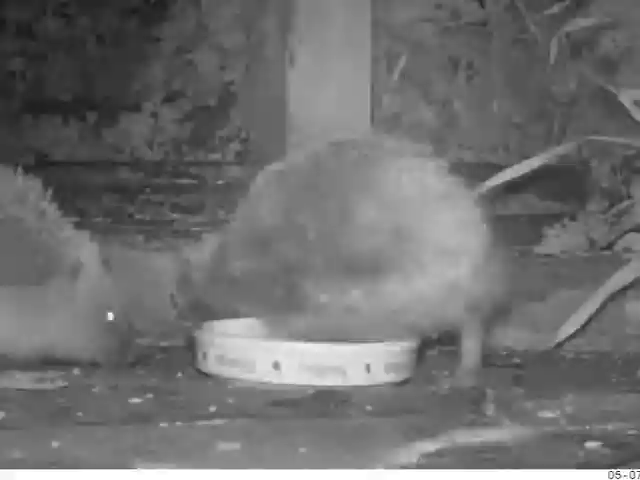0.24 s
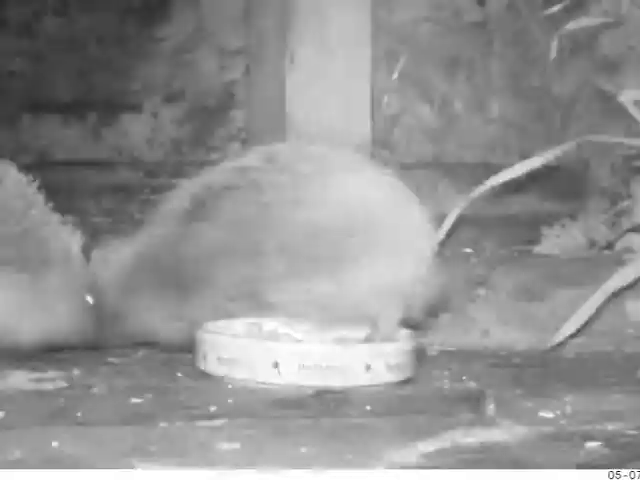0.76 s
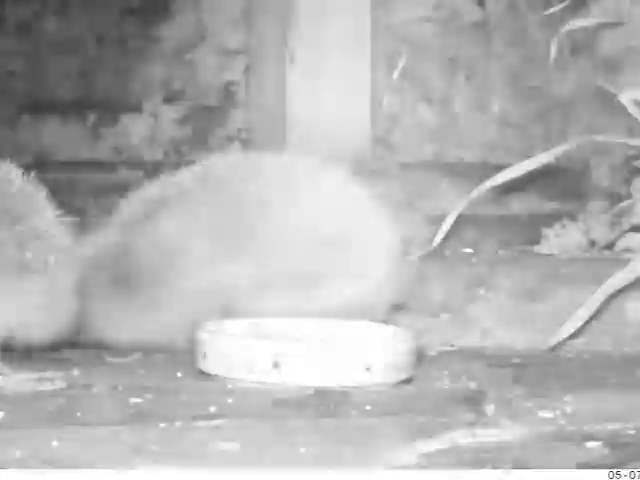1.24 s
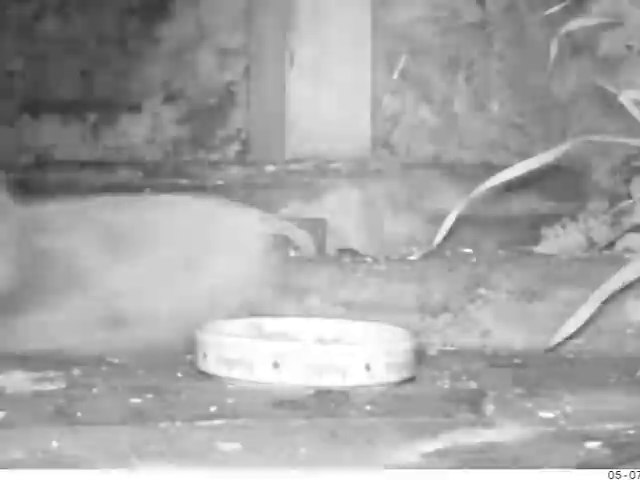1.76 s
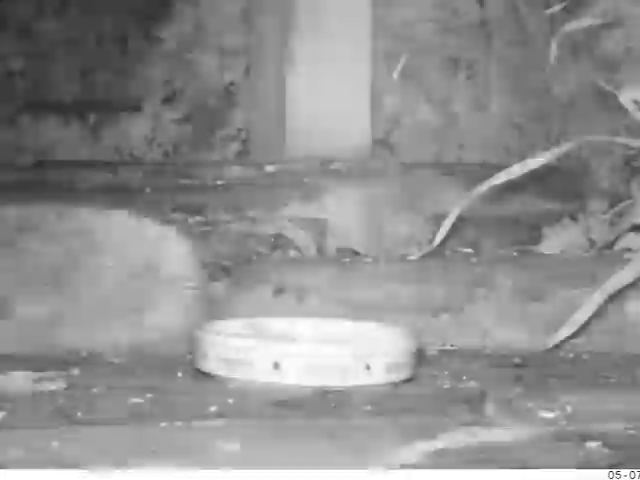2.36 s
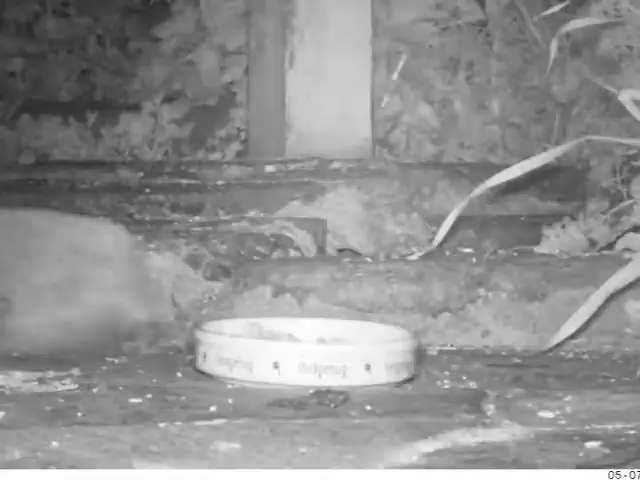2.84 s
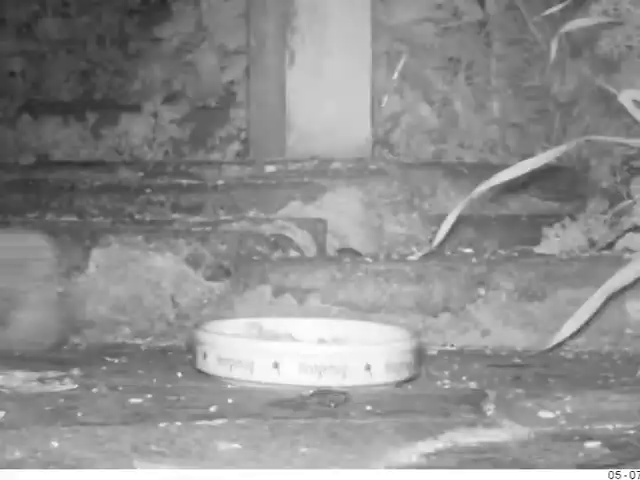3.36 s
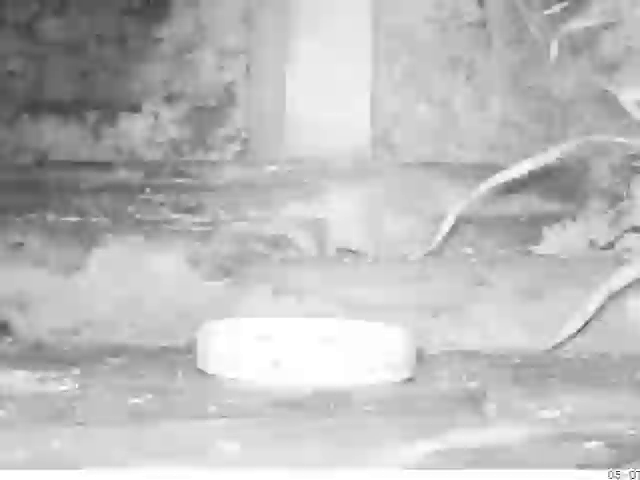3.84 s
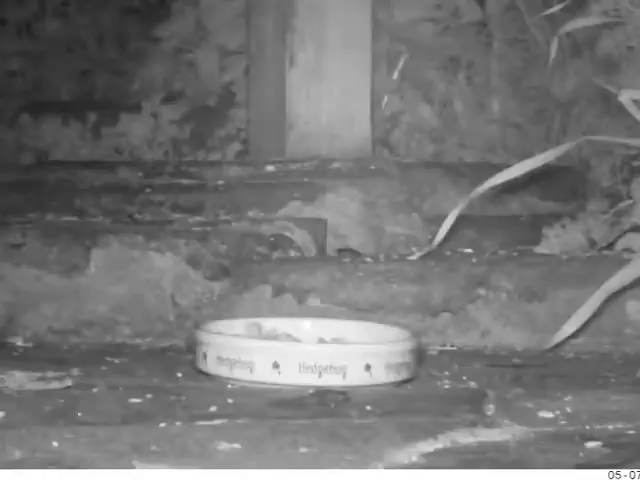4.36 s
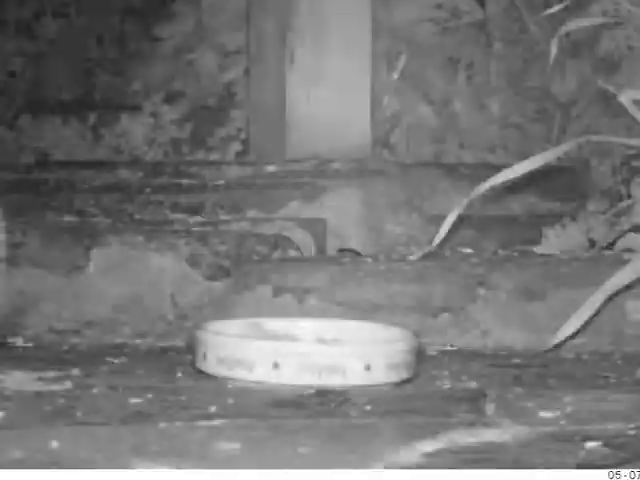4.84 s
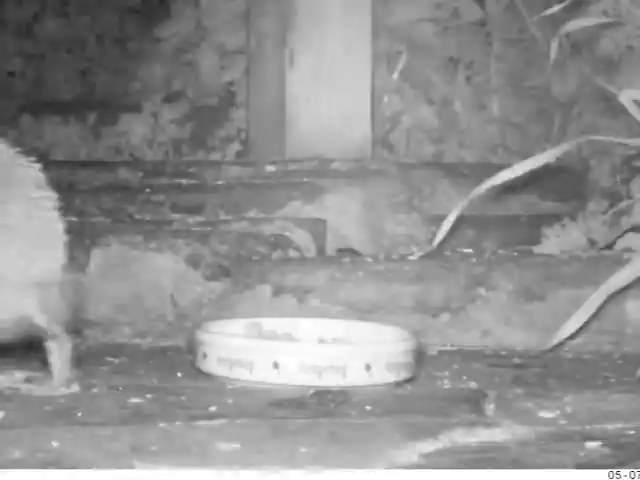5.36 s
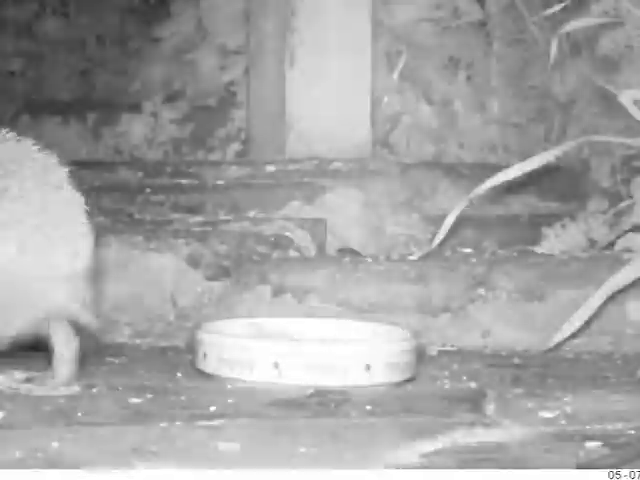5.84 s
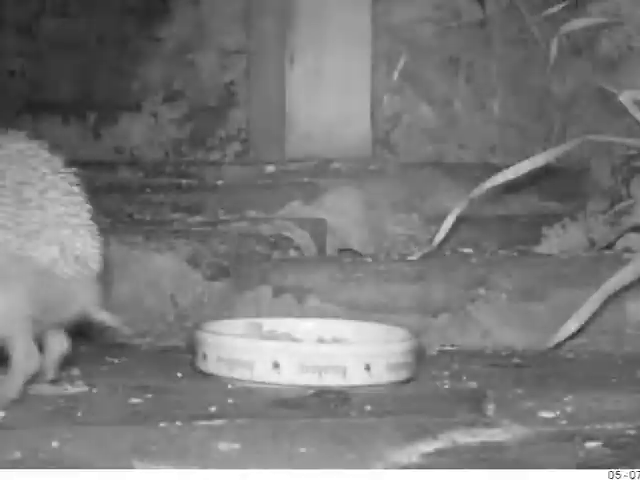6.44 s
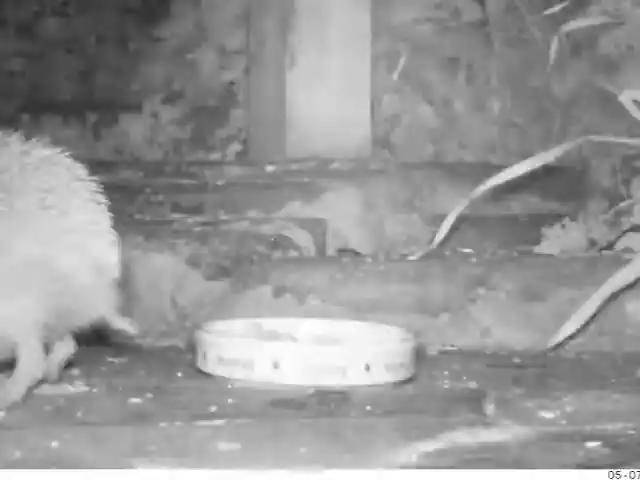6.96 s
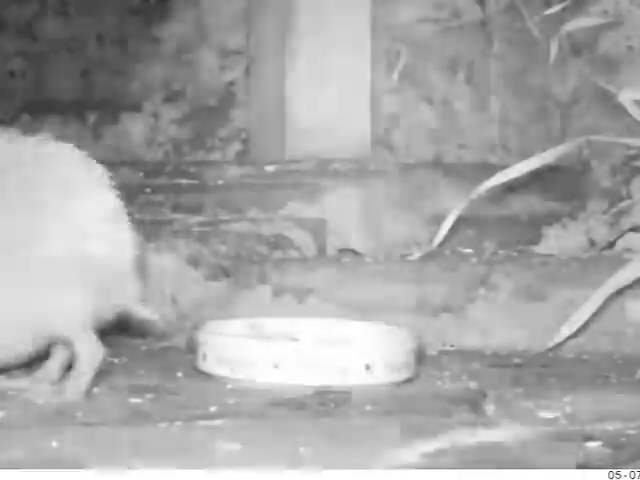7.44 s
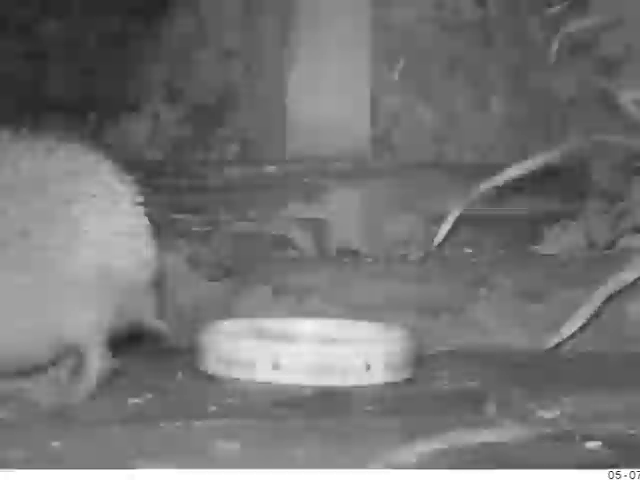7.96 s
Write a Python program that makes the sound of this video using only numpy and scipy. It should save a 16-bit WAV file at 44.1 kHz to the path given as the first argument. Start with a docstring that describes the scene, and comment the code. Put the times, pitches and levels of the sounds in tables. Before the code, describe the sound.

Close, dry, airy puffs from a hedgehog repeat steadily after a quick bowl clatter, with faint scratches, rustling spines and quiet garden rumble.

```python
"""A bowl knocks on wooden boards, then a hedgehog huffs about three times a second, close to a trail camera.
Two hedgehogs shuffle round each other beside the food bowl at night; one steps off it and it is brushed again.
Each huff is noise, a jet of air coloured by throat, nostrils and the bounce off the boards; the knock is
thuds of noise with ringing sine modes, touches are faint rings and scratches, the rustle is swelling noise.
Short echoes lie round the bowl and huffs, and a quiet garden rumble with a soft hiss lies beneath."""
import sys
import numpy as np
from scipy import signal
from scipy.fft import rfft, irfft
from scipy.io import wavfile

SR = 44100
rng = np.random.default_rng(int(sys.argv[2]) if len(sys.argv) > 2 else 0)


def to_wav(s):
    """Save 16-bit WAV."""
    ch = np.atleast_2d(s).T  # columns
    pcm = np.round(np.clip(ch, -1, 1) * 32767)  # PCM
    wavfile.write(sys.argv[1], SR, pcm.astype(np.int16))


N = 362061  # length in samples

# Huffs. Each row: start in seconds, length in seconds, strength at the nose in dB, swell from start to end in dB.
HUFFS = [(.101, 0.11, -42.5, -6), (.522, .1, -42, -2), (0.866, 0.11, -43, -4.5), (1.192, .1, -45, -5.5),
         (1.497, 0.098, -46, 5), (1.789, .094, -45, -5), (2.168, .12, -47, 0.5), (2.461, .094, -49, 1),
         (2.776, .11, -44.5, 1.5), (3.195, 0.088, -44, -0.5), (3.547, 0.09, -44.5, 4),
         (3.785, 0.087, -41, 2.5), (4.324, .11, -41.5, 2.5), (4.656, .11, -43, -2.5),
         (4.943, 0.092, -43, 4.5), (5.23, 0.085, -43, 7.5), (5.618, .1, -41.5, -2.5), (6.02, .1, -44.5, 0),
         (6.378, 0.096, -42.5, 2), (6.946, 0.078, -48, 4.5), (7.285, 0.091, -44, -5), (7.617, 0.1, -44, 5),
         (7.909, 0.082, -43.5, -2.5)]
# Pose of the snout before the microphone. Each row: time in seconds, band cancelled by the bounce off the
# boards in Hz, brightness from facing the microphone in dB, main nose resonance in Hz.
SNOUT = [(.1, 2100, 1.5, 4140), (.87, 2310, -3.5, 4210), (1.189, 3900, -1, 4110), (1.79, 3400, -4.5, 4080),
         (2.46, 3140, 1, 4080), (3.2, 2280, -2, 4090), (3.79, 2260, -2, 3960), (4.32, 2600, -6, 4060),
         (4.66, 4750, 0.5, 4060), (4.95, 5100, -4, 4020), (5.23, 2650, -3.5, 4060), (5.62, 2780, -4, 4070),
         (6.02, 2800, 6, 4020), (6.38, 2250, 5, 4010), (7.29, 1850, 3, 3970), (7.62, 1830, -2, 4030)]
# Nostril hiss in a huff of the usual strength. Each row: time in seconds, level in dB.
NOSTRIL_HISS_LEVEL = [(.6, -59), (1.3, -57), (3.7, -57.5), (4.5, -55.5), (5.6, -58.5), (6.1, -55.5),
                      (7.2, -58), (7.9, -53)]
# Resonances of lower throat, upper throat, nose at rest and nostril hiss, before any shift by pose or chance.
# Each row: frequency in Hz, width in Hz, relative level in dB.
THROAT = [(882, 810, -1), (325, 190, -6)]
UPPER_THROAT = [(1870, 390, 0), (2440, 900, -1)]
NOSE = [(3076, 610, -7), (3692, 420, -1.5), (4114, 460, 2.5), (5096, 492, -4.5), (5920, 210, -13),
        (6630, 700, -22.5)]
NOSTRIL_HISS = [(7500, 270, -19.5), (8030, 3100, -10), (11150, 2300, -9.5), (12040, 1100, 0.5),
                (13250, 1400, -11.5)]
REST_NOSE_HZ = 4047  # main nose resonance at rest
NOTCH_DB, NOTCH_WIDTH_HZ = -10.5, 340  # depth and width of the cancelled band
USUAL_DB = -44  # usual strength at the nose
THROAT_DB, UPPER_THROAT_DB = -52.5, -54.5  # in a huff of the usual strength
THROAT_FOLLOW, HISS_FOLLOW = .15, .25  # dB gained per dB of strength
UPPER_THROAT_TURN = .4  # dB lost per dB of facing the microphone


def huffs(attack_s=0.021, release_s=0.018, lead_s=.006, hang_s=0.0037, throat_lag_s=.0025,
          flutter_db=0.6, flutter_hz=150, sway_db=1.02, sway_hz=32, arch_db=1.5, hiss_stretch=0.013):
    """Each huff is a turbulent jet that snaps on, holds and stops; it rings throat and nose and hisses at the nostrils."""
    out, n = np.zeros(N), SR // 5
    t, f = np.arange(n) / SR, freqs(n)
    pose_s, *pose = np.transpose(SNOUT)
    hiss_s, hiss_levels_db = np.transpose(NOSTRIL_HISS_LEVEL)
    for s, length, nose_db, swell_db in HUFFS:
        notch_hz, tilt_db, nose_hz = (np.interp(s, pose_s, column) for column in pose)
        effort_db = nose_db - USUAL_DB
        hiss_db = np.interp(s, hiss_s, hiss_levels_db) + HISS_FOLLOW * effort_db

        # the bounce off the boards cuts a notch that moves with the snout
        notch = undb(NOTCH_DB * np.exp(-((f - notch_hz) / NOTCH_WIDTH_HZ) ** 2))
        paths = deflect(f)
        # a snout turned toward the microphone sounds brighter and less throaty
        facing = undb(tilt_db * np.interp(f, [3200, 5100], [-.5, .5]))
        nose = noise(n, paths * notch * facing * resonances(f * REST_NOSE_HZ / nose_hz, NOSE))

        lower = undb(THROAT_DB) * noise(n, paths * resonances(f, THROAT))
        upper = noise(n, paths * resonances(f, UPPER_THROAT))
        upper = irfft(notch * rfft(upper), n)  # here the notch also lowers the level
        throat = lower + undb(UPPER_THROAT_DB - UPPER_THROAT_TURN * tilt_db) * upper

        # the nostrils are never shaped quite the same twice
        stretch = 1 + hiss_stretch * rng.standard_normal()
        hiss = noise(n, paths * resonances(f * stretch, NOSTRIL_HISS))

        age = t - lead_s
        progress = np.clip(age / length, 0, 1) - .5  # -0.5 at the start, 0.5 at the end
        stop = (1 - np.tanh(2 * (age - length - hang_s) / release_s)) / 2
        flow = stop * undb(-arch_db * (2 * progress) ** 2)
        # the narrow nostrils sound first, the throat follows as the flow builds
        jet = undb(nose_db + swell_db * progress) * nose + undb(hiss_db) * hiss
        jet = push(t, attack_s) * jet
        rush = push(t, attack_s + throat_lag_s) * undb(THROAT_FOLLOW * effort_db) * throat
        # the moist nostrils flutter in the stream
        flutter = undb(flutter_db * walk(n, flutter_hz) + sway_db * walk(n, sway_hz))
        add(out, s - lead_s, flow * (jet * flutter + rush))
    return out


# Contacts of the bowl with the boards. Each row: time in seconds, relative level in dB.
KNOCKS = [(0.049, -5), (0.0511, 3), (0.0524, -2.5), (0.061, -19.5), (0.0723, -21.5), (0.0836, -23)]
# Colour of the thud of the boards. Each row: frequency in Hz, relative level in dB.
BOARDS = [(140, -36), (215, -4.5), (300, -10.5), (400, -22.5), (560, -12), (900, -14), (1300, -3.5),
          (1900, -9.5), (2600, -0.5), (3500, -11), (4500, -17.5), (6000, -32.5), (8500, -35.5),
          (14000, -55)]


def knock(thud_db=-21, thud_t60=0.023, tail_db=-16, tail_t60=.11, ring_db=-10.0, rise_s=0.00051,
          build_s=0.0037, chatter_db=2.0, chatter_hz=180, settle_db=-8, settle_s=.011):
    """The tipped bowl drops back and chatters: the boards thud at each contact, the bowl's ring builds up."""
    out, n = np.zeros(N), SR // 5
    t = np.arange(n) / SR
    decay = undb(-60 * t / thud_t60) + undb(tail_db - 60 * t / tail_t60)
    for s, db in KNOCKS:
        thud = noise(n, colour(n, BOARDS))
        add(out, s, undb(db + thud_db) * push(t, rise_s) * decay * thud)
    # once it is down, the wood damps the bowl, which buzzes against it and rings unevenly
    contact_db = (settle_db + chatter_db * walk(n, chatter_hz)) * push(t, settle_s)
    ring = undb(ring_db + contact_db) * push(t, build_s) * bowl_ring(t, False)
    add(out, KNOCKS[1][0], ring)  # the ring starts at the second contact
    return out


# Modes of the bowl on its boards, then one of its rim. Each row: frequency in Hz, time to fall 60 dB in
# seconds, relative level when knocked in dB, relative level when brushed in dB.
BOWL = [(215, 0.095, -18, -45.5), (549, 0.078, -16, -46.5), (1247, 0.077, -17.5, -41),
        (1600, 0.091, -18.5, -41), (2237, .06, -10, -33.5), (2410, .08, -16, -24.5),
        (2590, .06, -11.5, -35.5), (2814, .095, -3.5, -20), (2853, .025, -3.5, -25), (3080, .05, -12, -32),
        (3120, .07, -13.5, -29.5), (3370, 0.055, -15.5, -27), (4180, .055, -12.5, -8.5),
        (4430, 0.081, -19.5, -8), (7330, .05, -43.5, -14.5)]
RIM_MODE = (10590, .06, -27, -22)


def bowl_ring(t, brushed, spread_db=0):
    """Free ringing of the bowl; the place of contact decides how strongly each mode answers."""
    modes = BOWL + [RIM_MODE]
    place_db = spread_db * rng.standard_normal(len(modes))
    ring = np.zeros(len(t))
    for (hz, t60, knock_db, brush_db), extra_db in zip(modes, place_db):
        mode_db = (brush_db if brushed else knock_db) + extra_db
        ring += np.sin(2 * np.pi * hz * t) * undb(mode_db - 60 * t / t60)
    return ring


# Claws and spines touching bowl and boards. Each row: start in seconds, strength in dB, ring of the bowl in dB.
TOUCHES = [(0.0108, -54, 2), (.398, -53, 4.5), (.4387, -47.5, 2), (0.6664, -51, -16), (1.077, -60, -2),
           (1.1135, -52, -2.5), (1.174, -56, 0), (1.3344, -57.5, 1), (1.9242, -48, -16), (1.96, -48.5, -18),
           (6.8635, -57, -10)]


def touches(ring_db=-1.0, scratch_db=-5, scratch_t60=0.037, rise_s=.001):
    """Light contacts: a tiny scratch with a ring of the bowl, weakest where the bowl is hardly touched."""
    out, n = np.zeros(N), SR // 5
    t = np.arange(n) / SR
    scratch_colour = [(1000, -19.5), (3000, -10), (4300, 5.5), (6000, -13.5), (13000, -18)]  # (Hz, dB)
    for s, db, bowl_db in TOUCHES:
        ring = undb(ring_db + bowl_db) * bowl_ring(t, True, spread_db=5.0)
        scratch = noise(n, colour(n, scratch_colour)) * undb(scratch_db - 60 * t / scratch_t60)
        add(out, s, undb(db) * push(t, rise_s) * (ring + scratch))
    return out


# Shuffles of the animals. Each row: height of the move in seconds, level in dB.
SHUFFLES = [(1.05, -79.5), (2.0, -75.5), (4.9, -75.5), (5.779, -75.5), (7.2, -71.5)]
SHUFFLE_S, STIR_DB = 0.14, -82  # time a shuffle takes to swell or fade; rustle between shuffles


def rustle(grain_db=2.0, grain_hz=25):
    """Spines and feet brush softly all the time; each shuffle swells and fades."""
    t = np.arange(N) / SR
    motion = undb(STIR_DB) + sum(undb(db) * np.exp(-((t - s) / SHUFFLE_S) ** 2) for s, db in SHUFFLES)
    brush_colour = [(800, -21), (2800, -8), (4100, 0.5), (5200, -8), (6500, -14.5), (12000, -10.0)]  # (Hz, dB)
    brush = noise(N, colour(N, brush_colour))
    return brush * motion * undb(grain_db * walk(N, grain_hz))


def deflect(f, count=4):
    """Gain of a few reflections off bowl, wall and bodies, 10-90 cm longer than the direct path."""
    lags = rng.uniform(.1, .9, (count, 1)) / 343  # metres over the speed of sound in m/s
    # small objects throw back the short waves best
    strength = np.interp(f, [4000, 8000], [.15, .26])
    return np.abs(1 + strength * np.exp(-2j * np.pi * f * lags).sum(0))


def surroundings(x, wet_db=-15, t60=0.22, gap_s=0.0034):
    """Short scattered echoes from the wall and the boards."""
    t = np.arange(SR // 2) / SR
    # nothing returns before the gap; the echoes reach full strength one gap later
    onset = np.clip(t / gap_s - 1, 0, None).clip(max=1)
    echoes = rng.standard_normal(len(t)) * undb(-60 * t / t60) * onset
    echoes = echoes / np.sqrt(np.sum(echoes ** 2))
    return x + undb(wet_db) * signal.fftconvolve(x, echoes)[:N]


# Dips of the microphone port in the camera case. Each row: frequency in Hz, width in Hz, gain in dB.
PORT = [(4575, 197.6, -1), (5636, 130, -3.5), (7200, 260, -6.5), (9700, 250, -3)]


def port(x):
    """Sound reaches the microphone through a hole in the case, which cuts a few dips."""
    f = freqs(N)
    dips_db = sum(db * np.exp(-((f - hz) / width) ** 2) for hz, width, db in PORT)
    return irfft(rfft(x) * undb(dips_db), N)


# Colour of night air and microphone hiss. Each row: frequency in Hz, relative level in dB per Hz.
NIGHT = [(10, -14), (22, 4.5), (38, 1), (70, -4.5), (146, -10), (290, -17), (750, -27), (1160, -32.5),
         (3100, -38.5), (7000, -44.5), (13500, -46)]
NIGHT_DB = -53.5  # rms level


def night():
    """Steady low rumble of the night air with a smooth hiss above it."""
    return noise(N, colour(N, NIGHT)) * undb(NIGHT_DB)


def undb(db):
    """Decibels to gain."""
    return 10 ** (np.asarray(db) / 20)


def unit(x):
    """Scale to rms 1."""
    return x / np.sqrt(np.mean(x ** 2))


def freqs(n):
    """Frequencies in Hz of the spectrum of n samples, none below 1."""
    return np.maximum(np.arange(n // 2 + 1) * SR / n, 1)


def noise(n, gain):
    """Noise of rms 1 shaped by the given gain at each frequency."""
    real, imaginary = rng.standard_normal((2, n // 2 + 1))
    return unit(irfft((real + 1j * imaginary) * gain, n))


def colour(n, points):
    """Gain through (Hz, dB) points, joined by straight lines over log frequency."""
    hz, db = np.transpose(points)
    return undb(np.interp(np.log(freqs(n)), np.log(hz), db))


def resonances(f, table):
    """Gain of steep resonances whose powers add."""
    power = 0
    for hz, width, db in table:
        detuning = (f * f - hz * hz) / (f * width)
        power = power + undb(db) ** 2 / (1 + detuning ** 2) ** 2
    return np.sqrt(power)


def walk(n, rate):
    """Smooth chance of spread 1 that changes about rate times a second."""
    return noise(n, 1 / (1 + (freqs(n) / rate) ** 4))


def push(t, rise_s):
    """Smooth rise of a force or a flow."""
    return np.sin(np.pi / 2 * np.clip(t / rise_s, 0, 1)) ** 2


def add(out, s, x):
    """Mix x into out from time s on."""
    i = max(int(s * SR), 0)
    out[i:i + len(x)] += x[:len(out) - i]


def scene():
    """Animals and bowl near the wall, heard through the port, over the night air."""
    echoing = surroundings(huffs() + knock() + touches())
    through_port = port(echoing + rustle())
    return (through_port + night())[None]  # one channel


TOP_HZ = 13800  # upper limit of the camera's sound


def record(dry):
    """The camera cuts the top with a steep low-pass."""
    low_pass = signal.ellip(10, .2, 70, TOP_HZ, fs=SR, output="sos")
    return signal.sosfilt(low_pass, dry)


dry = scene()
out = record(dry)
to_wav(out)
```